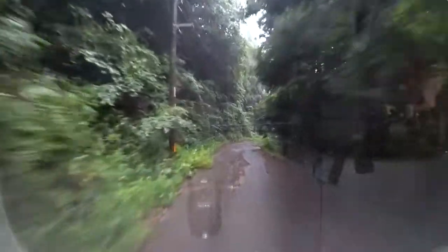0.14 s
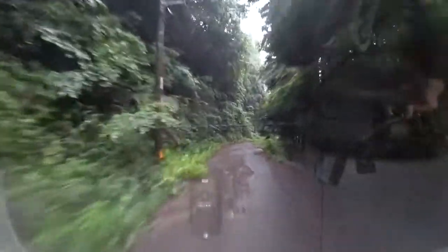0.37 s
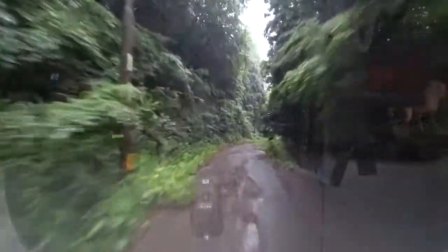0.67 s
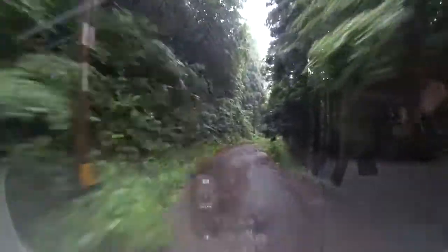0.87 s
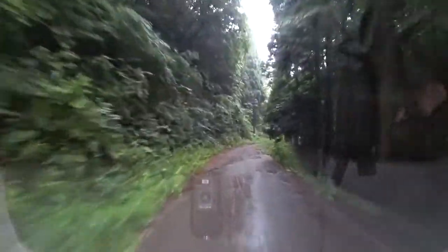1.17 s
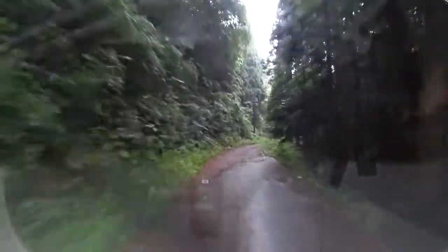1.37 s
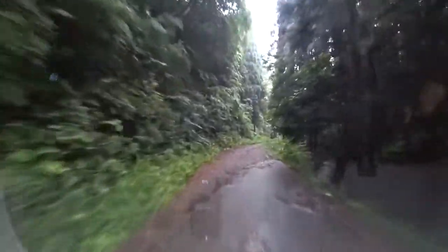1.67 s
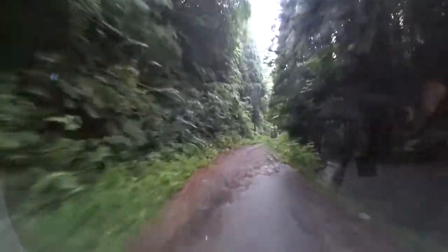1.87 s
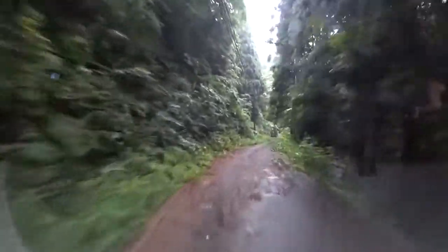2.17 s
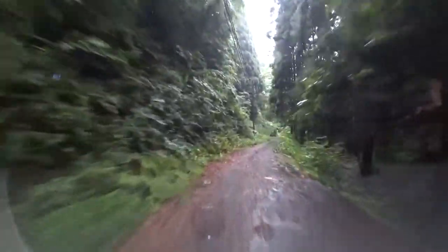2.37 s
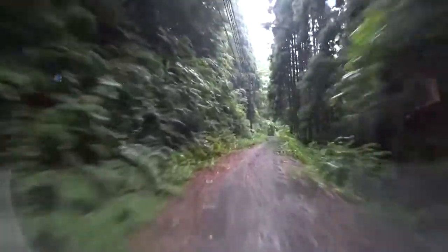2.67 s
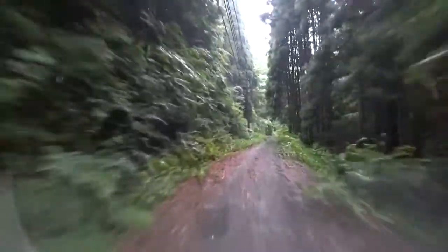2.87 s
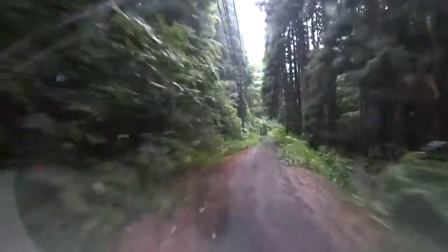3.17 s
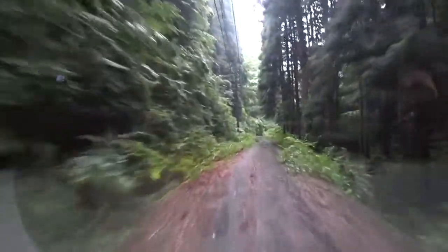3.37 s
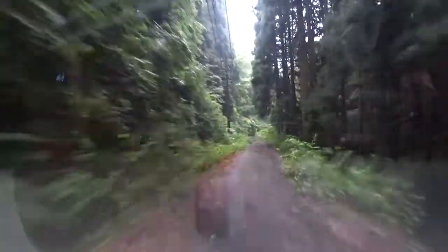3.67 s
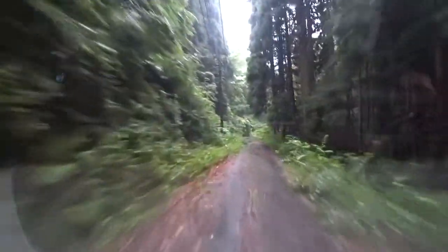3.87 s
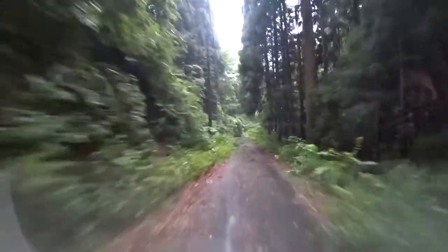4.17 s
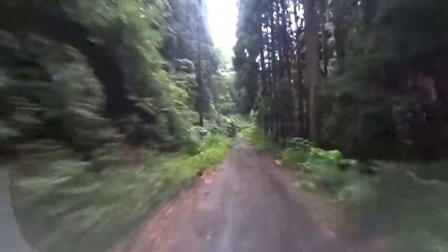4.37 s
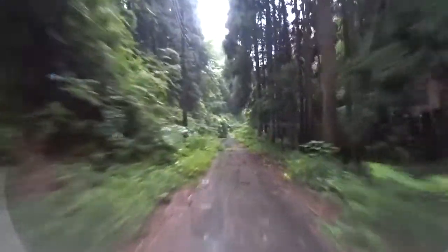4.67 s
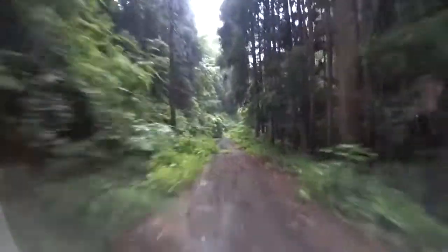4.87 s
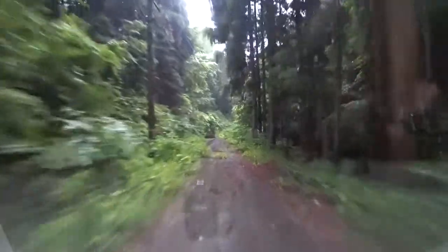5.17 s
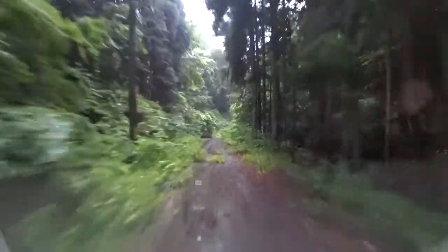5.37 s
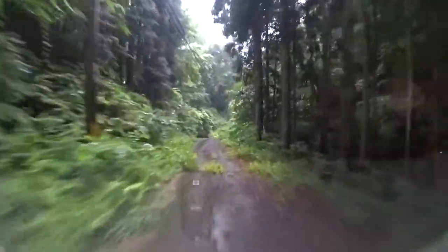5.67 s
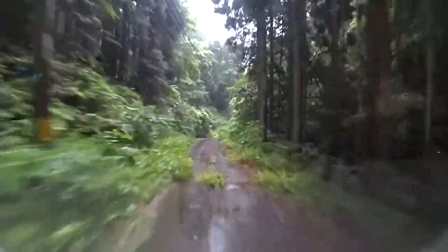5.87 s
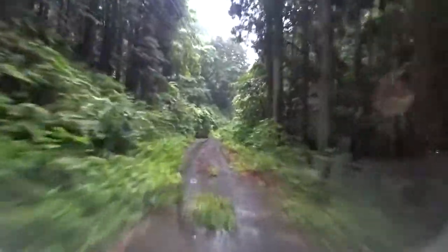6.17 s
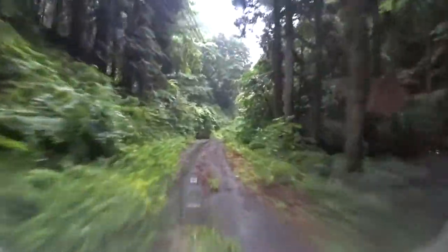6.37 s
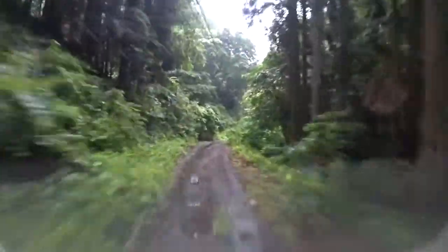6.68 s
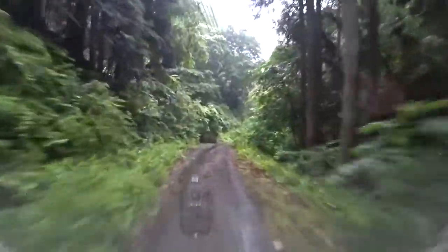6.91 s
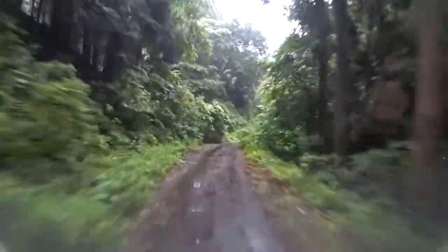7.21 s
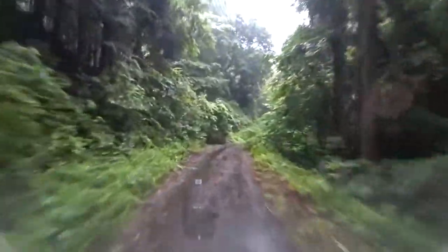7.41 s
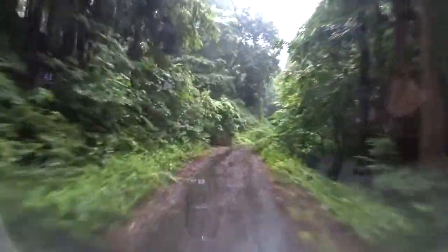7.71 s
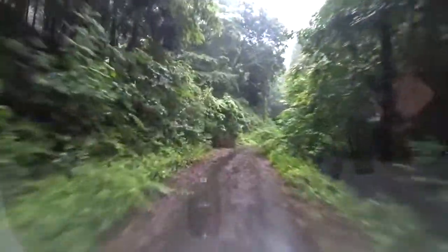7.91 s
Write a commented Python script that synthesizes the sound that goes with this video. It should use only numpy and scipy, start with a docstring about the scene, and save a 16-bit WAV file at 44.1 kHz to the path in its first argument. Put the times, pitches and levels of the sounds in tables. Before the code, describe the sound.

Heard inside a moving car on a narrow wet forest road: wipers give a dull double knock with a short rattle slightly under twice a second. Drops from trees patter irregularly on roof, pillars and windscreen, some hollow, some clicking. Low tyre and body rumble swells and dips beneath. A small camera microphone behind the screen adds faint hiss.

```python
"""Inside a car on a narrow wet forest road, wipers knock twice at every turn: short pulsed tones with a
noisy rattle. Rain dripping from the trees patters on roof, pillars and screen: random blows excite resonances.
Body and tyres rumble beneath: a wavering low tone and noise through resonances, both varying in level.
A small camera behind the screen adds hiss, dulls two narrow bands and spreads the sound in stereo."""
import sys
import numpy as np
from scipy import signal
from scipy.fft import rfft, irfft, next_fast_len
from scipy.io import wavfile
from scipy.ndimage import uniform_filter1d

SR = 44100
rng = np.random.default_rng(int(sys.argv[2]) if len(sys.argv) > 2 else 0)


def waveform_to_disk(signal):
    """Save audio, clipped to [-1, 1], as 16-bit WAV at the path in sys.argv[1]."""
    frames = np.transpose(np.atleast_2d(signal))
    scaled = np.clip(frames, -1, 1) * 32767
    samples = np.round(scaled).astype(np.int16)
    wavfile.write(sys.argv[1], SR, samples)


N = 354995  # length [samples]
T = np.arange(N) / SR  # time [s]
M = next_fast_len(N)  # transform length [samples]
HZ = np.maximum(np.arange(M // 2 + 1) * SR / M, 1)  # frequency of each transform bin, at least 1 [Hz]


def undb(db):
    """Decibels to amplitude: 20 dB is a factor of ten."""
    return 10 ** (np.asarray(db) / 20)


def level(x, db):
    """Scale to a root-mean-square level [dB]."""
    return x * undb(db) / np.sqrt(np.mean(x ** 2))


def over_hz(table):
    """Spectral interpolation: a (frequency [Hz], value) table read on a logarithmic frequency axis."""
    hz, value = np.transpose(table)
    return np.interp(np.log(HZ), np.log(hz), value)


def over_time(table):
    """Linear interpolation: the columns of a curve table read at every sample."""
    s, *columns = np.transpose(table)
    return [np.interp(T, s, column) for column in columns]


def colour(x, gain):
    """Linear filtering: multiply the spectrum by a gain given at every frequency."""
    return irfft(rfft(x, M) * gain, M)[..., :N]


def ring(x, modes, steep=1.57, damp=1):
    """Modal superposition: parallel resonances, neighbours in opposite phase.

    steep sets how fast their skirts fall, damp widens them.
    """
    response = 0
    for k, (hz, width_hz, db) in enumerate(modes):
        detuning = (HZ ** 2 - hz ** 2) / (HZ * width_hz * damp)
        response = response + (-1) ** k * undb(db) / (1 + 1j * detuning) ** steep
    return colour(x, response)


def walk(rate):
    """Low-pass random modulation: levels held 1 / rate s and smoothed twice; spread near 0.5."""
    hold = int(SR / rate)
    steps = np.repeat(rng.standard_normal(N // hold + 1), hold)
    return 0.67 * uniform_filter1d(uniform_filter1d(steps, hold), hold)[:N]


def wipers(push_s=0.012, rattle_s=0.015):
    """Impact excitation: as the blade flips, a soft push sounds a few cycles, then the linkage rattles on."""
    # wiper turns: (time [s], first knock [dB], its tone [Hz], lag of second arm [s], its knock [dB],
    # its tone [Hz], relative rattle [dB])
    turns = [(-.033, -14, 324, 0.06, -25, 330, -23), (.543, -12, 312, .063, -26, 467, -22.5),
             (1.129, -13.5, 320, .054, -21.5, 336, -23.5), (1.692, -11.5, 320, .063, -25, 467, -21),
             (2.277, -16, 321, 0.059, -32.5, 403, -20.5), (2.853, -13.5, 330, .061, -21.5, 417, -23),
             (3.443, -17, 323, .058, -22.5, 320, -24.5), (4.01, -11.5, 327, .063, -24, 422, -24),
             (4.598, -21, 386, 0.053, -29, 343, -26.5), (5.169, -12, 325, 0.057, -24, 356, -24),
             (5.7572, -16, 308, 0.058, -27, 335, -30.5), (6.323, -14, 326, .067, -23, 385, -27),
             (6.9087, -15, 290, 0.057, -22.5, 347, -23.5), (7.476, -13.5, 325, 0.058, -26, 326, -27)]
    # resonances of the linkage: (frequency [Hz], width [Hz], relative level [dB])
    linkage = [(210, 90, -0.5), (320, 187, 2), (460, 136, 0), (760, 97, -19)]
    second_rattle_db = -1.5  # rattle of the second arm against the first
    tick_hz, tick_db, tick_s, tick_lead_s = 633, -17.5, 0.0019, .002  # level against the knock
    out, kick, t = np.zeros(N + SR), np.zeros(N), T[:SR // 10]
    push = np.sin(np.pi * np.minimum(t / push_s, 1) ** 0.73) ** 1.5
    # the lip of the blade starts to tick just before the knock
    lip = (t / tick_s) ** 2 * np.exp(-t / tick_s)
    tick = undb(tick_db) * lip / lip.max() * np.sin(2 * np.pi * tick_hz * t)
    lead = int(tick_lead_s * SR)
    for turn_s, first_db, first_hz, lag_s, second_db, second_hz, turn_rattle_db in turns:
        first_arm = (turn_s, first_db, first_hz, turn_rattle_db)
        second_arm = (turn_s + lag_s, second_db, second_hz, turn_rattle_db + second_rattle_db)
        for s, db, hz, rattle_db in (first_arm, second_arm):
            i = int((s - .0018) * SR)  # the push begins ahead of the listed time
            if i >= lead:
                tone = np.sin(2 * np.pi * hz * t)
                out[i - lead:i - lead + len(t)] += undb(db) * tick
                out[i:i + len(t)] += undb(db) * push / push.max() * tone
                kick[i] = undb(rattle_db)
    age = T[:SR // 4] / rattle_s
    swell = signal.fftconvolve(kick, age * np.exp(-age))[:N]
    return out[:N] + swell * level(ring(rng.standard_normal(N), linkage), 0)


def splash(kick, fade_s):
    """Noise burst with exponential decay: each blow becomes a short fading crackle."""
    tail = np.exp(-np.arange(SR // 20) / (fade_s * SR))
    tail = tail * (1 - tail ** 6)  # soft onset: the burst rises quickly, then fades
    return signal.fftconvolve(kick, tail)[:N] * rng.standard_normal(N)


def patter(per_s, scatter_db, bunch_db):
    """Random point process of varying rate: small drops in bunches, many faint and a few strong."""
    when, size = rng.random((2, N))
    lands = when < per_s * undb(bunch_db * walk(30)) / SR
    return lands * undb(np.minimum(-scatter_db * np.log(size), 16))


def rain():
    """Forced modal response: spray, fine patter and big drops ring roof, pillars and screen, with a high snap."""
    # fine patter: (time [s], roof level [dB], pillars level [dB], screen level [dB]), before the gusts
    fine_levels = [(0.0, -44, -55.5, -65), (0.12, -52, -58.5, -62), (0.4, -47, -55, -60.5),
                   (0.83, -54, -59, -62), (1.3, -53.5, -59.5, -61), (1.8, -54, -59, -62.5),
                   (2.31, -53, -59, -61), (2.44, -46, -54.5, -61), (3.03, -56, -60, -60),
                   (3.38, -42.5, -53, -58), (4.01, -47.5, -52, -56), (4.26, -51.5, -55.5, -61.5),
                   (4.64, -52, -58.5, -57.5), (5.16, -46.5, -56, -58.5), (5.52, -56.5, -62.5, -63),
                   (5.83, -43.5, -53, -58.5), (6.14, -48, -60.5, -64), (6.48, -46, -54.5, -57.5),
                   (6.75, -52, -57, -61), (7.15, -50, -57, -60), (7.62, -50.5, -59.5, -63.5),
                   (8.05, -44.5, -54, -63)]
    # big drops, before the gains below: (time [s], screen [dB], roof [dB], pillars [dB], snap [dB])
    big_drops = [(0.105, -40, -55, -56, -65), (0.1825, -52, -22.5, -56, -77), (0.2031, -54, -40, -43, -76),
                 (0.234, -59, -36, -44, -76), (0.2865, -42.5, -52, -42, -72),
                 (0.3376, -58, -37.5, -39, -72), (0.37, -41.5, -46, -43, -72),
                 (0.4091, -42, -40, -41.5, -74), (0.4664, -47, -47, -55, -76),
                 (0.4821, -45, -48, -42.5, -76), (0.588, -42.5, -41, -44, -68),
                 (0.67, -38.5, -55, -45, -74), (0.6926, -51, -55, -59, -76), (0.7429, -45, -40, -43.5, -72),
                 (0.756, -39.5, -49, -49, -76), (0.7763, -43.5, -42, -51, -76),
                 (0.9671, -38.5, -36.5, -53, -73), (0.9993, -44, -55, -61, -76),
                 (1.061, -44, -49, -60, -79), (1.1243, -40, -54, -59, -74), (1.4017, -48, -59, -54, -76),
                 (1.4377, -46, -57, -55, -74), (1.5395, -44, -57, -65, -76), (1.686, -62, -46, -47, -75),
                 (1.817, -39, -66, -50, -59), (1.8773, -54, -37, -46, -78), (1.8996, -47, -53, -59, -74),
                 (1.969, -43.5, -40, -44.5, -73), (2.0087, -43, -58, -47, -74), (2.104, -48, -54, -49, -76),
                 (2.1215, -40.5, -43, -50, -72), (2.1924, -53, -56, -64, -76), (2.238, -48, -25, -43, -78),
                 (2.2644, -55, -51, -58, -68), (2.292, -48, -31, -42, -66), (2.3412, -50, -28, -35.5, -72),
                 (2.357, -43, -41, -36.5, -72), (2.3787, -43, -32, -39, -74),
                 (2.39, -48, -29.5, -38.5, -74), (2.4124, -60, -39, -40, -78), (2.451, -60, -30, -39, -76),
                 (2.482, -39.5, -35, -42, -75), (2.524, -44, -31, -40, -77), (2.5508, -44, -37, -46.5, -76),
                 (2.6131, -36.5, -63, -50, -66), (2.64, -37, -42, -39, -72), (2.671, -41, -40.5, -44, -73),
                 (2.6968, -46, -28.5, -39.5, -76), (2.783, -42, -45, -51, -73),
                 (2.8723, -38.5, -50, -58, -70), (2.884, -38, -47, -41, -73), (2.969, -44, -55, -45, -70),
                 (3.0512, -58, -43, -43, -76), (3.0824, -51, -50, -45, -74), (3.119, -40, -43, -46, -73),
                 (3.153, -43.5, -48, -45, -73), (3.178, -46, -47, -56, -73), (3.1951, -36, -30, -38, -69),
                 (3.228, -43.5, -49, -56, -70), (3.2412, -55, -31, -39, -73),
                 (3.2706, -38.5, -30, -38.5, -63), (3.288, -50, -34, -41.5, -76),
                 (3.305, -43, -50, -41, -74), (3.3506, -55, -42, -48, -76), (3.365, -49, -38, -40, -74),
                 (3.3739, -27, -25, -29.5, -65), (3.3915, -55, -45, -42, -72), (3.4507, -40, -44, -54, -72),
                 (3.4905, -50, -27, -40, -75), (3.527, -48, -43, -38.5, -70), (3.559, -42.5, -34, -40, -76),
                 (3.5942, -35.5, -37, -33, -71), (3.673, -40, -33, -48, -74), (3.719, -47, -34, -47, -75),
                 (3.7785, -34, -49, -42.5, -66), (3.813, -55, -53, -54, -76), (3.8354, -53, -43, -50, -78),
                 (3.845, -41.5, -43, -58, -74), (3.96, -36, -24.5, -35, -74),
                 (4.0446, -58, -29.5, -43, -79), (4.0653, -46, -26.5, -35, -75),
                 (4.088, -58, -37, -42, -76), (4.119, -48, -38, -50, -75), (4.134, -50, -31.5, -39, -75),
                 (4.167, -49, -35, -44.5, -76), (4.193, -66, -34.5, -47, -74), (4.262, -36, -61, -49, -64),
                 (4.2976, -41, -53, -61, -71), (4.327, -42, -52, -52, -72), (4.356, -36, -60, -54, -72),
                 (4.4408, -38, -43, -53, -67), (4.5182, -48, -55, -55, -75), (4.569, -46, -53, -57, -70),
                 (4.586, -45, -38, -62, -61), (4.6192, -39, -33.5, -56, -62), (4.6357, -37, -39, -55, -57),
                 (4.6753, -53, -52, -51, -74), (4.7702, -41, -54, -56, -69), (4.8766, -43, -33.5, -40, -73),
                 (5.0095, -28, -43, -38.5, -55), (5.0452, -41.5, -47, -60, -68),
                 (5.089, -47, -54, -50, -74), (5.1275, -45.5, -59, -60, -73), (5.335, -40, -60, -46, -64),
                 (5.36, -43, -48, -53, -72), (5.4553, -52, -23, -50, -72), (5.4645, -34, -34.5, -28.5, -73),
                 (5.548, -50, -54, -61, -76), (5.5744, -47, -38, -45, -79),
                 (5.584, -40.5, -34.5, -34.5, -76), (5.6228, -42.5, -49, -44.5, -80),
                 (5.6648, -46, -30.5, -44, -75), (5.702, -61, -30.5, -57, -80),
                 (5.8054, -45, -28, -41.5, -69), (5.8487, -40, -38, -40.5, -72),
                 (5.912, -44, -45, -45, -76), (5.9408, -40, -32, -38.5, -78),
                 (6.1136, -45, -50, -44.5, -78), (6.235, -39, -27, -35, -72), (6.3612, -42, -47, -57, -80),
                 (6.398, -38.5, -48, -41.5, -68), (6.427, -42, -45, -46, -76), (6.5078, -49, -38, -44, -78),
                 (6.5952, -40, -31.5, -43, -72), (6.66, -41, -36.5, -57, -70), (6.719, -46, -41, -64, -76),
                 (6.8329, -45, -50, -48, -74), (6.9726, -47, -50, -46, -72), (6.99, -36.5, -29, -52, -70),
                 (7.1254, -41.5, -36, -38.5, -80), (7.1497, -44, -39, -39, -78),
                 (7.2586, -57, -58, -67, -72), (7.2976, -56, -41, -49, -78), (7.3476, -37.5, -40, -44, -66),
                 (7.3532, -44, -45, -38, -78), (7.398, -39, -37, -42, -60), (7.446, -46, -58, -63, -74),
                 (7.567, -43, -37, -46, -76), (7.6097, -44, -55, -47, -74), (7.66, -39.5, -55, -49, -65),
                 (7.7488, -39.5, -39, -39.5, -65), (7.814, -55, -44, -48, -78), (7.948, -44, -63, -44, -72),
                 (8.0289, -40.5, -25.5, -41, -71)]
    # resonances of each surface: (frequency [Hz], width before damping [Hz], relative level [dB])
    roof_modes = [(427, 77, 10), (605.6, 33, 7), (685, 55, 6), (890, 110, -4)]
    pillar_modes = [(1117, 101, -3.5), (1478, 187, -1.5), (2087, 356, -13.5)]
    screen_modes = [(3100, 890, -8), (4370, 580, -5), (4794, 182, 4.5), (5203, 605, -4.5),
                    (6400, 210, -16.5), (8200, 300, -34.5)]
    snap_modes = [(7660, 670, 2.5), (9150, 960, -18.5), (10300, 1700, -6)]
    # a big drop also bends the whole roof panel: (frequency [Hz], width before damping [Hz], relative level [dB])
    thud_modes = [(320, 127, 7.5)]
    spatter_db, spatter_s = -12.5, 0.0092  # droplets thrown off by a big drop: gain, fade
    place_shift = 0.02  # small drops land at two places, tuned this share above and below the mean

    roof_db, pillars_db, screen_db = over_time(fine_levels)
    s, drop_screen_db, drop_roof_db, drop_pillars_db, drop_snap_db = np.transpose(big_drops)
    shared = patter(per_s=90, scatter_db=4.5, bunch_db=6.0)
    place = rng.choice([-1, 1], N)
    out, gust_db = 0, 2.5 * walk(24)  # the drip comes and goes with the branches overhead
    # modes, body modes, fine level [dB], big drops [dB], fade [s], spray amount, damping, skirt steepness
    surfaces = (
        (roof_modes, thud_modes, roof_db, drop_roof_db + 13.0, .0025, .018, 2.6, 1.75),
        (pillar_modes, [], pillars_db, drop_pillars_db + 21.5, .0018, .009, 1.6, 1.8),
        (screen_modes, [], screen_db, drop_screen_db + 11.0, .001, .012, 1.4, 1.8),
        (snap_modes, [], -88.5, drop_snap_db + 12.0, .0007, .002, 1.4, 1.7))
    for modes, body, fine_db, drop_db, fade_s, spray, damp, steep in surfaces:
        # spray thrown up by the wheels is an even shower under the drops
        small = spray + shared + patter(per_s=240, scatter_db=2.0, bunch_db=5.0)
        fine = 0
        for p in (-1, 1):
            shifted = [(hz * (1 + p * place_shift), width_hz, db) for hz, width_hz, db in modes]
            fine = fine + ring(splash(small * (place == p), fade_s), shifted)
        big = np.zeros(N)
        big[(s * SR).astype(int)] = undb(drop_db)
        # a big drop lands with a tick before it splashes, and its spatter lingers
        blow = 5.76 * big + 0.56 * splash(big, 1.3 * fade_s)
        blow = blow + undb(spatter_db) * splash(big, spatter_s)
        out = out + level(fine, 0) * undb(fine_db + gust_db)
        out = out + ring(blow, body + modes, steep=steep, damp=damp)  # its weight of water damps the ring
    return out


def road():
    """Random vibration of resonators: the shell booms on a wavering note, rough ground drives floor and tyres."""
    # rumble before random swings: (time [s], floor drone level [dB], tyre rumble level [dB])
    rumble = [(0.0, -42, -29), (0.2, -45, -33.5), (2.4, -42.5, -31), (2.53, -41.5, -37), (2.8, -35, -27),
              (3.07, -40.5, -30.5), (4.01, -31.5, -30), (4.33, -34.5, -28), (4.46, -39.5, -33),
              (4.57, -35, -25), (4.82, -43, -34.5), (4.87, -37.5, -30.5), (5.92, -36, -29.5),
              (6.12, -32.5, -32), (6.25, -41, -35.5), (6.43, -39, -30.5), (7.5, -38.5, -34),
              (7.98, -42, -36.5), (8.05, -50.5, -38)]
    # shell boom before random swings: (time [s], level [dB])
    boom = [(0.0, -46.5), (0.78, -53), (0.92, -40.5), (0.99, -58), (1.21, -37.5), (2.24, -46),
            (2.31, -33.5), (2.38, -52), (2.6, -29.5), (2.69, -40), (3.5, -42), (3.56, -31.5), (4.15, -42),
            (4.24, -34.5), (4.82, -38.5), (4.91, -24), (5.0, -37.5), (5.87, -39), (6.41, -33), (7.69, -48),
            (7.78, -45.5), (8.05, -53)]
    # resonances of the floor and of the tyre cavities: (frequency [Hz], width [Hz], relative level [dB])
    floor_modes = [(48, 8.5, -1), (60, 10, -1), (82.8, 19.4, 2.5), (134.1, 21, -2)]
    tyre_modes = [(177.3, 22.3, 3.5), (229.4, 18.6, 0), (260.7, 20.8, -3), (294.8, 39.1, -4.5),
                  (354, 44.3, -12), (458, 82, -23), (607, 81, -27.5)]
    shell_hz, shell_waver_hz = 30.8, 4.06  # mean note, waver per unit of walk
    shake_db, shake_width_hz = -5, 15  # random shaking of the shell, before the sum is normalised

    floor_db, tyres_db = over_time(rumble)
    note = np.sin(2 * np.pi * np.cumsum(shell_hz + shell_waver_hz * walk(11)) / SR)
    floor = ring(rng.standard_normal(N), floor_modes, steep=1.248)
    tyres = ring(rng.standard_normal(N), tyre_modes, steep=1.248)
    shake = ring(rng.standard_normal(N), [(shell_hz, shake_width_hz, 0)])
    shell = note + level(shake, shake_db)
    rough = walk(8.9)  # patches of rougher ground
    shell = level(shell, 0) * undb(over_time(boom)[0] + 5.0 * walk(11.0))
    floor = level(floor, 0) * undb(floor_db + 1.6 * rough)
    tyres = level(tyres, 0) * undb(tyres_db + 1.3 * rough + 1.9 * walk(26))
    return shell + floor + tyres


def scene():
    """Mid-side stereo in quadrature: the side signal is the cabin sound a quarter cycle off; right leads."""
    # stereo width: (frequency [Hz], side minus mid [dB])
    spread = [(30, -8), (100, -3.5), (170, 0.5), (280, 4), (470, 7), (900, 11), (1500, 5.5), (1800, 13.5),
              (2400, 8.5), (3150, 0.5), (3600, 5), (4600, 3), (6300, 2.5), (9000, -5)]
    # channel balance: (frequency [Hz], left minus right [dB])
    balance = [(30, -0.5), (1000, -0.1), (3000, 1), (6000, 3.5)]
    turn, lean = 1j * undb(over_hz(spread)), undb(over_hz(balance) / 2)
    cabin = road() + rain() + wipers()
    return colour(cabin, np.array([(1 - turn) * lean, (1 + turn) / lean]))


def record(dry):
    """Band-limited pickup: the housing dulls two bands, each channel has its own hiss, the top is cut."""
    # housing of the microphone: (frequency [Hz], width [Hz], depth [0-1])
    dips = [(1708, 65, 1), (3555, 180, 1)]
    # shape of the hiss before it is scaled: (frequency [Hz], relative spectral density [dB])
    hiss_shape = [(20, 22.5), (150, -11), (1000, 16), (3000, 3.5), (5000, 6.5), (7000, -5), (9000, -9.5),
                  (11000, -6.5)]
    hiss_db, top_hz = -60, 11050  # hiss level before the top cut, edge of the top cut
    housing = 1
    for hz, width_hz, depth in dips:
        housing = housing * (1 - depth / (1 + ((HZ - hz) / (width_hz / 2)) ** 2))
    hiss = colour(rng.standard_normal((2, N)), undb(over_hz(hiss_shape)))
    heard = colour(dry, housing) + level(hiss, hiss_db)
    top_cut = signal.ellip(10, .2, 60, top_hz, fs=SR, output="sos")
    return signal.sosfilt(top_cut, heard)


dry = scene()
out = record(dry)
waveform_to_disk(out)
```